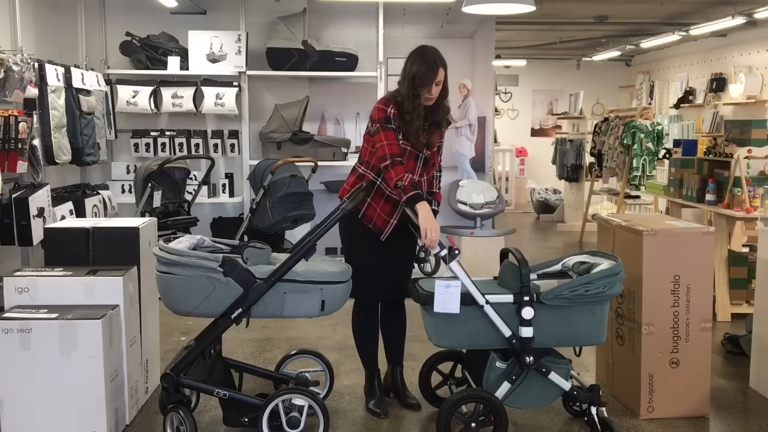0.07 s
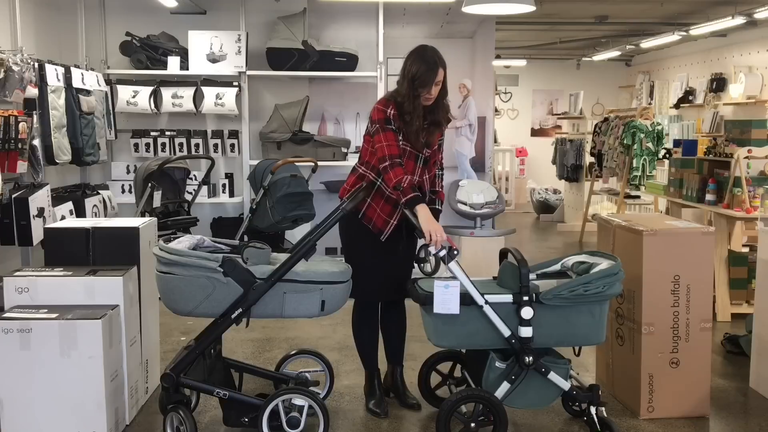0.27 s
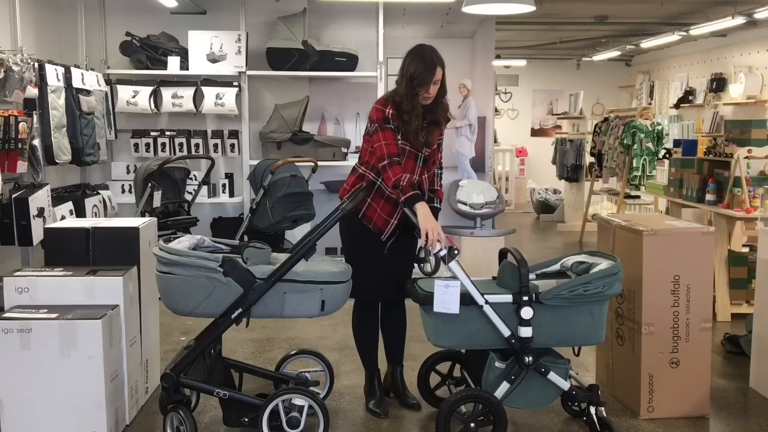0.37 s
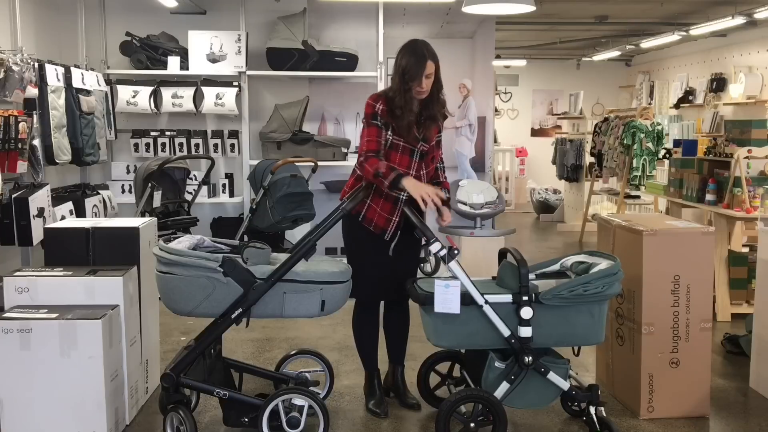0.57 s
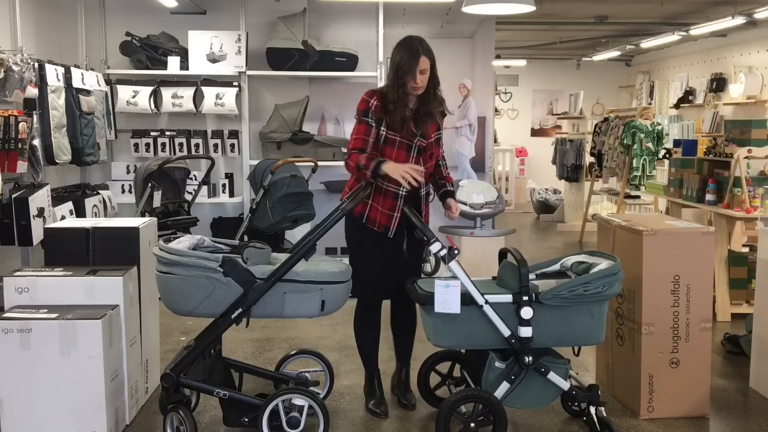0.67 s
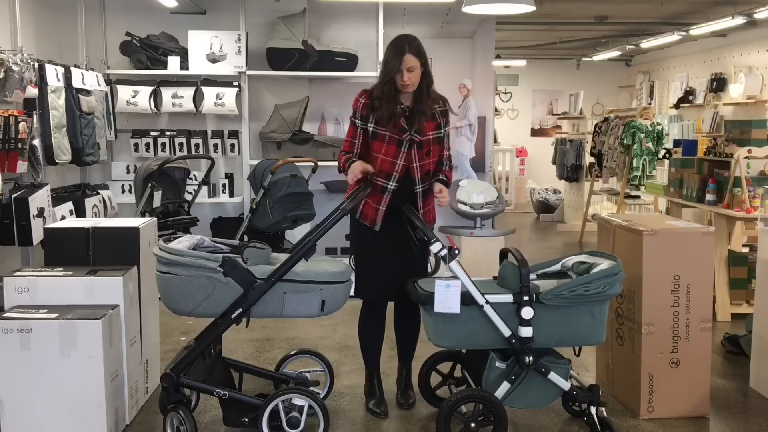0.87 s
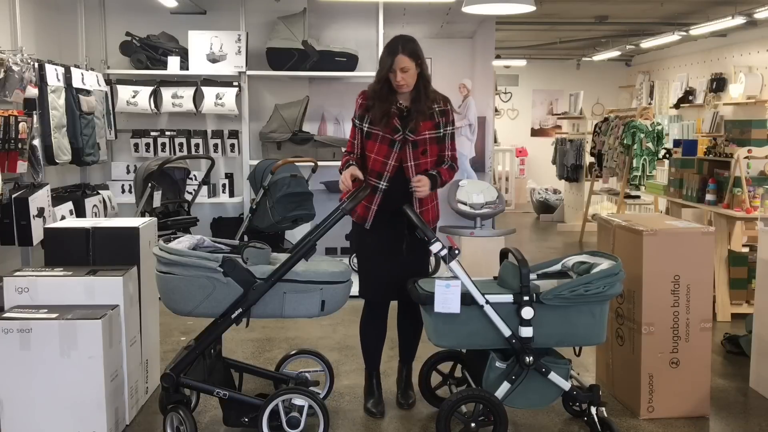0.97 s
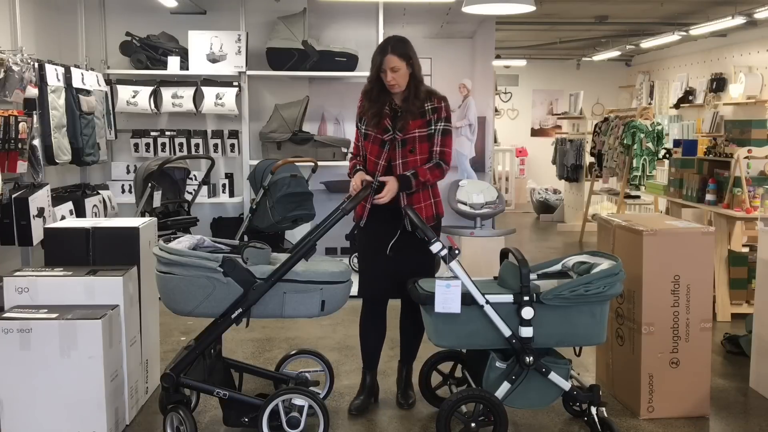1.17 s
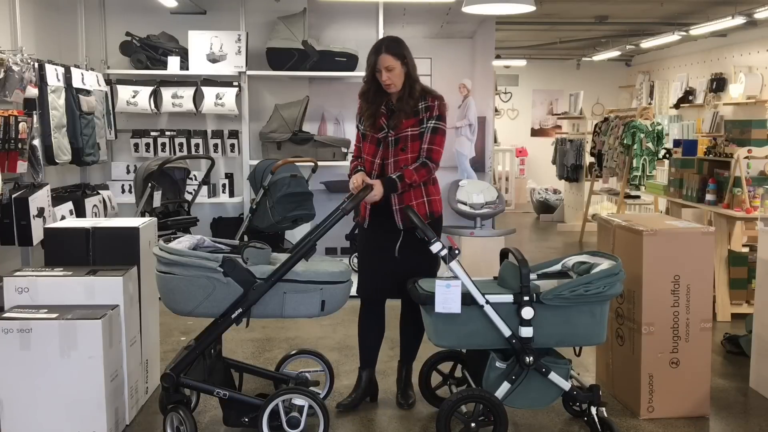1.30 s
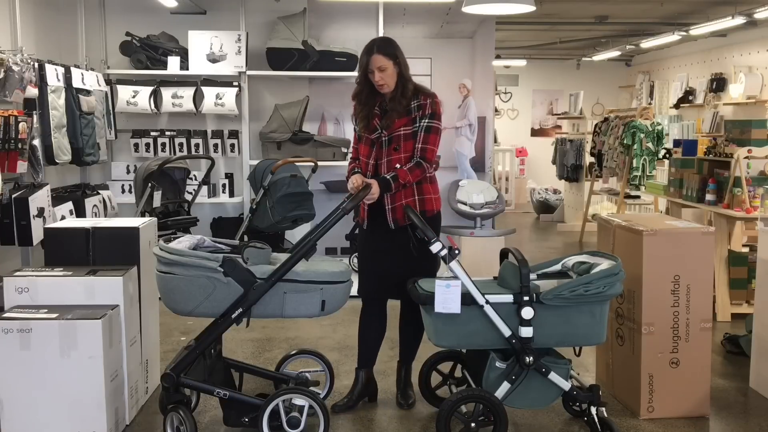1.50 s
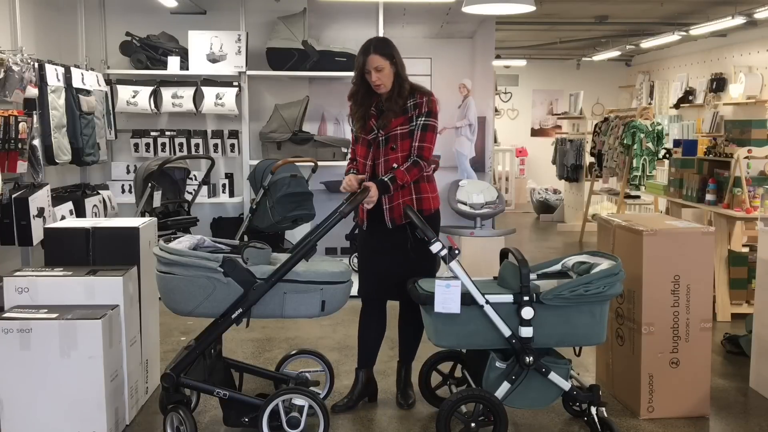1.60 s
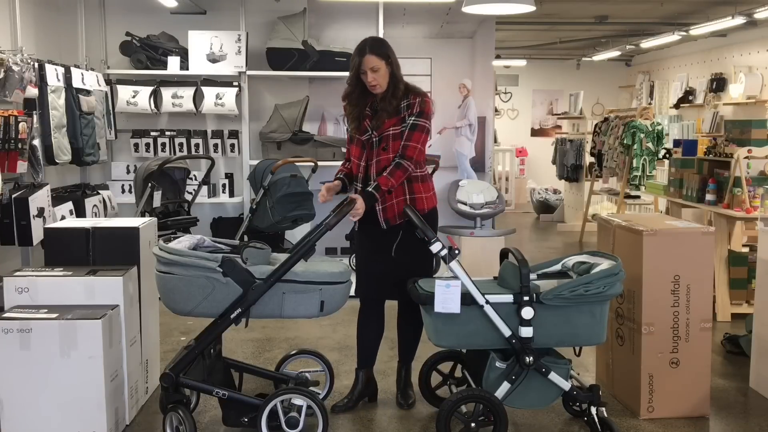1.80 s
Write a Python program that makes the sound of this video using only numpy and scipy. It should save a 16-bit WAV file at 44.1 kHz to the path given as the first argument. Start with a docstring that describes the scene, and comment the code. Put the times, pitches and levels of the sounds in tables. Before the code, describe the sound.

A stroller handlebar snaps free and at once locks with a loud double click that echoes briefly in a shop. Cloth brushes faintly, then a hand makes soft ticks, bumps and a light rub over low ventilation hum.

```python
"""A shop hums with low ventilation rumble. A stroller's handlebar is set: the catch snaps free,
then the lock slams home with a sharp double click and rattles faintly. Each snap has a quick echo
off the floor, and the room rings on. A sleeve brushes by. Last, a hand takes hold of a second
handlebar with a few ticks and soft bumps, and slides along its textured grip with a rising rasp."""
import sys
import numpy as np
from scipy import signal
from scipy.fft import rfft, irfft
from scipy.io import wavfile
from scipy.ndimage import map_coordinates

SR = 44100
rng = np.random.default_rng(int(sys.argv[2]) if len(sys.argv) > 2 else 0)


def materialize(psi):
    """Save the field psi as 16-bit PCM at rate SR to the path in sys.argv[1].

    A 1-D psi becomes a single channel; in a 2-D psi each row is a channel.
    """
    bounded = np.clip(np.atleast_2d(psi).T, -1, 1)
    quanta = np.round(bounded * 32767).astype(np.int16)
    wavfile.write(sys.argv[1], SR, quanta)


N = 81585


def lock():
    """The lock slams home and rattles faintly; its housing and tube ring."""
    # A sharp double click, its quick echo off the floor, then the rattle.
    # Each row: start in seconds, level in dB, crack t60 in seconds.
    transients = [(.2421, -4.5, 0.0047), (.2441, -5.5, .0045), (.2498, -9, .005), (.2562, -24, .015),
                  (.2622, -22, .012), (.2905, -26.5, 0.024)]
    # The tone of each crack. Each row: frequency in Hz, relative level in dB.
    colour = [(60, -30), (160, -16), (300, -15), (550, -16.5), (800, -21), (1050, -2.5), (1550, -10),
              (2100, 3), (3000, 1.5), (4200, -1.5), (7000, 0.5), (9000, 0.5), (10500, -4.5), (12200, 0),
              (15500, -11.5)]
    # Housing and tube modes. Each row: frequency in Hz, relative level in dB, t60 in seconds.
    modes = [(2033, -21.5, .14), (2322, -24.5, .14), (2470, -23.5, 0.11), (2610, -24, 0.075),
             (2860, -25.5, .14), (2910, -22.5, 0.069), (3013, -18, 0.11), (3153, -14, .13),
             (3933, -21, 0.24), (4385, -23.5, .09), (5076, -16, 0.095), (5240, -17.5, .09),
             (6130, -18, .08), (6920, -20, .09), (8018, -21.5, .1), (11216, -23.5, .07),
             (12200, -23.5, 0.064)]
    return snap(transients, colour, modes, ring_db=-1)


def catch():
    """The catch snaps free and rings briefly."""
    # The catch's clicks and their quick echo off the floor.
    # Each row: start in seconds, level in dB, crack t60 in seconds.
    transients = [(.1955, -52, 0.052), (.2030, -33, 0.0086), (.2037, -14, .012), (.2058, -15, .012),
                  (.2127, -20, .007), (.2215, -28, .02)]
    # The tone of each crack. Each row: frequency in Hz, relative level in dB.
    colour = [(150, -18.5), (500, -20), (850, -20), (1150, -3.5), (1700, -4), (2400, -1), (4300, 1),
              (6500, -3), (9500, -11.5), (12000, -3.5), (15500, -18.5)]
    # The catch's modes. Each row: frequency in Hz, relative level in dB, t60 in seconds.
    modes = [(1217, -21, 0.14), (2283, -18.5, 0.14), (3275, -9, .04), (3988, -10, .07), (4447, -11.5, .045),
             (5790, -11.5, 0.079), (12100, -19.5, .05), (12270, -23, .04)]
    return snap(transients, colour, modes, ring_db=-2)


def snap(transients, colour, modes, ring_db):
    """Hard plastic clicks and their floor echo crack into the room; the hardest rings the part."""
    cracks, ringing = np.zeros(N), np.zeros(N)
    for start, db, t60 in transients:
        add(cracks, start, room(amp(db) * coloured(crack(t60), colour)))
    start, db, _ = max(transients, key=lambda row: row[1])
    add(ringing, start, amp(db + ring_db) * ring(modes, scatter_db=1.1))
    return cracks + room(ringing, wet_db=-6)  # the ring stays drier than the cracks


def bumps():
    """The hand lands softly on the second handlebar and the frame thuds."""
    # The soft landings. Each row: start in seconds, level in dB.
    landings = [(1.648, -37), (1.6739, -29.5), (1.7064, -29.5), (1.745, -38.5)]
    # The frame's modes. Each row: frequency in Hz, relative level in dB, t60 in seconds.
    modes = [(125.6, -4, 0.1), (160, 2, 0.069), (205, -4.5, 0.074), (309, -5.5, 0.06), (450.4, -18, 0.13),
             (800, -18.5, .06), (948, -16.5, 0.053), (1178, -20, 0.053)]
    attack_s = 0.0048
    onset = 1 - np.exp(-clock() / attack_s)
    thuds = np.zeros(N)
    for start, db in landings:
        add(thuds, start, amp(db) * ring(modes, scatter_db=2.7) * onset)
    return room(thuds, wet_db=-7)


def finger_ticks():
    """Fingers meet the grip in small, dull ticks."""
    # The touches. Each row: start in seconds, level in dB, t60 in seconds.
    touches = [(1.5219, -59.5, 0.065), (1.6112, -49.5, 0.035), (1.619, -54, .02), (1.6384, -51, .07),
               (1.6645, -43, 0.038), (1.6736, -41.5, 0.041), (1.683, -47.5, .04)]
    # The tone of each tick. Each row: frequency in Hz, relative level in dB.
    colour = [(200, 7), (900, 6.5), (2000, 2.5), (4000, 3.5), (7000, -6.5), (10000, -12), (15500, -27)]
    ticks = np.zeros(N)
    for start, db, t60 in touches:
        add(ticks, start, amp(db) * coloured(crack(t60), colour))
    return ticks


def hand_slide():
    """Skin rubs along the grip: a grainy hiss, and a rasp that climbs as the hand speeds up."""
    # The swell of the hiss. Each row: time in seconds, level in dB.
    swell = [(1.62, -83.5), (1.67, -57), (1.72, -57), (1.75, -57), (1.79, -55), (1.85, -56)]
    # The tone of the hiss. Each row: frequency in Hz, relative level in dB.
    colour = [(300, -5.5), (1200, -5), (2500, -5), (4000, -2.5), (5200, 1.5), (7500, -2.5), (9500, -4),
              (11000, -12.5), (15500, -15)]
    # The rasp of the grip's texture. Each row: time in seconds, centre in Hz, level in dB.
    sweep = [(1.74, 4500, -72), (1.775, 4800, -62), (1.793, 5050, -57), (1.816, 5700, -61.5),
             (1.85, 6500, -68)]
    t = clock()
    grain_db = 1.5 * wobble(rate=400)
    hiss = amp(np.interp(t, *np.transpose(swell)) + grain_db) * noise(colour)
    times, hz, db = np.transpose(sweep)
    phase = 2 * np.pi * np.cumsum(np.interp(t, times, hz)) / SR
    # Fast random modulation spreads the rising tone into a band of noise.
    rasp = unit(wobble(rate=2000) * np.cos(phase) + wobble(rate=2000) * np.sin(phase))
    rasp_level = amp(np.interp(t, times, db)) * (t > times[0])
    return hiss + rasp_level * rasp


def sleeve():
    """Faint brushes of cloth swell and fade."""
    # The brushes. Each row: peak time in seconds, level in dB, rise and fall widths in seconds.
    brushes = [(.68, -68, .12, 0.069), (1.054, -67, 0.026, 0.045), (1.469, -73, 0.0245, 0.017)]
    # The tone of the cloth. Each row: frequency in Hz, relative level in dB.
    colour = [(500, -5.5), (2000, -1.5), (5000, 2.5), (9000, -2.5), (13000, -6), (15500, -10.5)]
    t, level = clock(), np.zeros(N)
    for peak, db, rise, fall in brushes:
        width = np.where(t < peak, rise, fall)
        level += amp(db) * np.exp(-((t - peak) / width) ** 2 / 2)
    return level * noise(colour)


def room(x, wet_db=0):
    """The dry sound, early reflections off near shelves and floor, then the shop's diffuse tail."""
    # The tail's decay. Each row: frequency in Hz, t60 in seconds.
    decay = [(150, .4), (1100, .42), (2500, .56), (5000, 0.55), (8000, 0.44), (15000, 0.34)]
    # The tail's tone. Each row: frequency in Hz, relative level in dB.
    colour = [(150, -0.5), (1200, 4.5), (2600, 2), (5000, -0.5), (9000, -2.5), (15000, 1.5)]
    tail_db, early_db = -4.5, -5.5
    predelay_s, build_s = .005, 0.0055
    t = np.arange(32768) / SR
    hz, when, bands = signal.stft(rng.standard_normal(len(t)), SR, nperseg=256)
    bands = bands * fade(when, along(decay, hz)[:, None])
    tail = signal.istft(bands, SR)[1] * (1 - np.exp(-t / build_s))
    tail = coloured(tail / np.linalg.norm(tail), colour)
    early = rng.standard_normal(len(t)) * (rng.random(len(t)) < .1) * fade(t, t60=.12)
    response = amp(tail_db) * tail + amp(early_db) * early / np.linalg.norm(early)
    out = x.copy()
    add(out, predelay_s, amp(wet_db) * signal.fftconvolve(x, response))
    return out


def ventilation():
    """Steady air noise over a narrow rumble that swells slowly."""
    # The tone of the shop air. Each row: frequency in Hz, relative level in dB.
    air_colour = [(41, -28), (70, -4.5), (113, -12.5), (148, -7), (174, -18), (218, -13), (293, -18.5),
                  (351, -17), (431, -25), (761, -26), (853, -24.5), (1280, -29.5), (2370, -33.5),
                  (2840, -40.5), (16000, -55.5)]
    # The tone of the rumble. Each row: frequency in Hz, relative level in dB.
    rumble_colour = [(20, -29.5), (38, -24.5), (47, -1.5), (54, 3), (62, -16.5), (100, -27), (300, -120)]
    # The rumble's swells. Each row: time in seconds, level in dB.
    swells = [(0, -53.5), (.36, -62), (.5, -46), (.64, -45.5), (.8, -52.5), (1.0, -57.5), (1.251, -46),
              (1.38, -51), (1.46, -46.5), (1.579, -55), (1.85, -45.5)]
    air_db = -53
    low = signal.hilbert(noise(rumble_colour))
    rumble = unit(low.real / (abs(low) + 0.31))  # evens out the noise's own surges
    rumble_level = amp(np.interp(clock(), *np.transpose(swells)))
    return amp(air_db) * noise(air_colour) + rumble_level * rumble


def crack(t60):
    """A burst of dense, quickly damped vibration with an even spectrum."""
    t = np.arange(4096) / SR
    shape = fade(t, t60)
    spectrum = rfft(rng.standard_normal(len(t)) * shape)
    burst = irfft(spectrum / (abs(spectrum) + 1e-9)) * fade(t, 10 * t60)
    return np.pad(burst, (0, N - len(t))) * np.linalg.norm(shape) / np.linalg.norm(burst)


def ring(modes, scatter_db):
    """Damped modes of alternating polarity, struck a little differently each time."""
    t, out = clock(), np.zeros(N)
    for k, (hz, db, t60) in enumerate(modes):
        gain = (-1) ** k * amp(db + scatter_db * rng.standard_normal())
        out += gain * fade(t, t60) * np.sin(2 * np.pi * hz * t)
    return out


def coloured(x, points):
    """x through a causal filter of unit energy with the given spectrum."""
    size = 16384
    gain = unit(amp(along(points, np.fft.rfftfreq(size, 1 / SR))))
    cepstrum = irfft(np.log(gain + 1e-9))
    cepstrum[1:size // 2] *= 2  # folding to minimum phase keeps attacks sharp
    cepstrum[size // 2 + 1:] = 0
    return signal.fftconvolve(x, irfft(np.exp(rfft(cepstrum))))[:len(x)]


def noise(points):
    """Coloured noise of rms 1."""
    return unit(coloured(rng.standard_normal(N), points))


def wobble(rate):
    """A smooth random curve through `rate` points a second."""
    return map_coordinates(rng.standard_normal(int(N * rate / SR) + 4), [clock() * rate])


def fade(t, t60):
    """Exponential decay, 60 dB down after t60 seconds."""
    return np.exp(-np.log(1000) * t / np.maximum(t60, 1e-4))


def along(points, hz):
    """Interpolate (Hz, value) points on a log frequency axis."""
    freqs, values = np.transpose(points)
    return np.interp(np.log(hz + 1), np.log(freqs + 1), values)


def add(track, start, sound):
    """Mix a sound in at start seconds."""
    i = int(np.clip(round(start * SR), 0, N - 1))
    track[i:] += sound[:N - i]


def amp(db):
    """Decibels to gain."""
    return 10 ** (np.asarray(db) / 20)


def unit(x):
    """Scale to rms 1."""
    return x / np.sqrt(np.mean(x ** 2) + 1e-20)


def clock():
    """Time of each sample in seconds."""
    return np.arange(N) / SR


def scene():
    """Both snaps and the handling noises share one room over the ventilation bed, in mono."""
    snaps = catch() + lock()
    handling = room(finger_ticks() + hand_slide() + sleeve()) + bumps()
    return (snaps + handling + ventilation())[None]


def record(dry):
    """Peaks clip near full scale, then a steep low-pass trims the highest treble."""
    ceiling, top_hz = .85, 15900
    lowpass = signal.ellip(12, .1, 90, top_hz, fs=SR, output="sos")
    return signal.sosfilt(lowpass, np.clip(dry, -ceiling, ceiling))


dry = scene()
out = record(dry)
materialize(out)
```